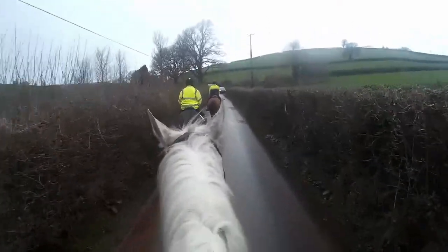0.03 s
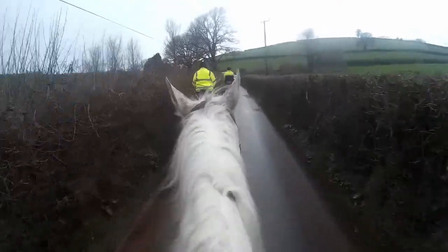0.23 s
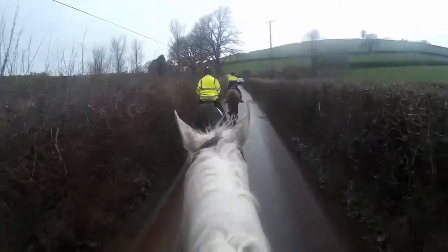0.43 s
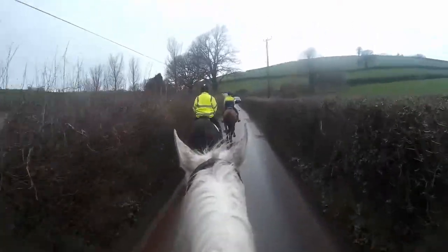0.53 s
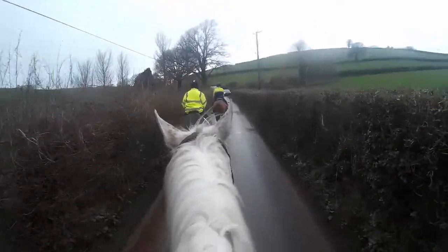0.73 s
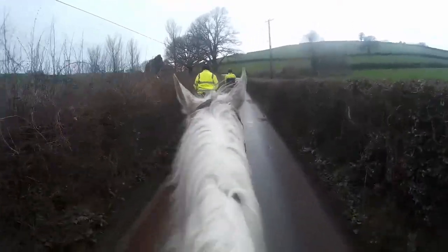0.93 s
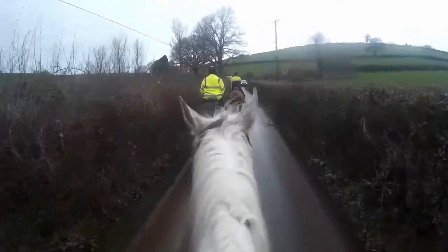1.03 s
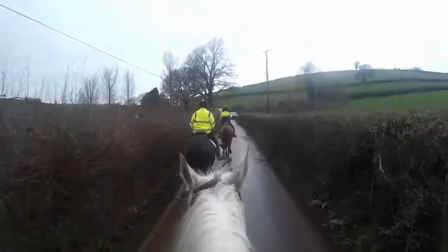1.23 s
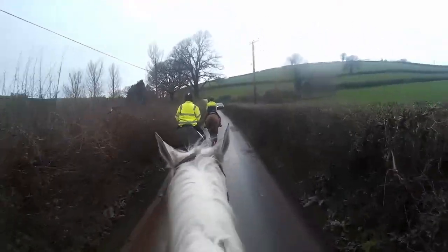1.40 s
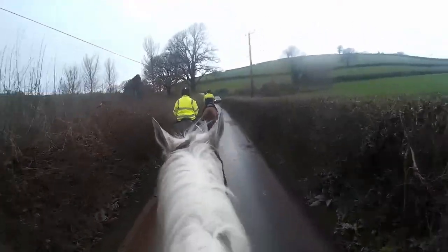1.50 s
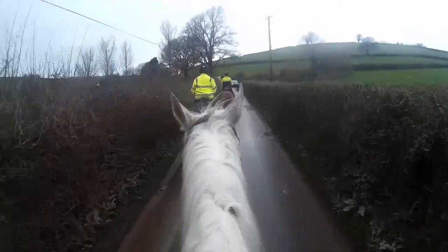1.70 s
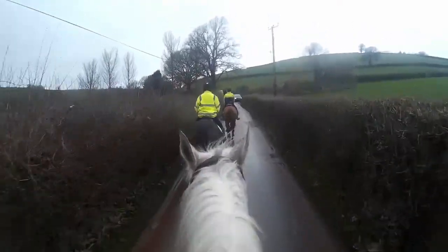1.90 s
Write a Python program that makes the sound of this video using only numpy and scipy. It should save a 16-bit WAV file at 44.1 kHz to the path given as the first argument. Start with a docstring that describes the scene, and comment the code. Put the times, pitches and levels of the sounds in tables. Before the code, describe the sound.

A walking horse's hooves clop on a paved lane, heard from the saddle, at about 0.2, 0.6, 0.9, 1.3 and 1.6 seconds, the first loudest. A shoe scrapes briefly near 0.6 and 1.3 seconds. Low microphone thumps with small tack clicks come around 0.2, 0.9 and 1.6 seconds, among soft saddle bumps. Other horses clop more quietly ahead throughout, over faint outdoor air.

```python
"""Hard, hollow hoof knocks on a wet paved lane between hedges, heard from the saddle of a walking horse.
Each impact of a shoe excites the resonances of the hoof; now and then a shoe slides in stick-slip.
Once a stride a jolt thumps the microphone and the tack clicks, and the swaying rider bumps softly.
Other horses clop a little way ahead, over faint outdoor air. Only the left channel sounds."""
import sys
import numpy as np
from scipy import signal
from scipy.fft import rfft, irfft, next_fast_len
from scipy.io import wavfile

SR = 44100
rng = np.random.default_rng(int(sys.argv[2]) if len(sys.argv) > 2 else 0)


def log_audio(samples):
    """Write samples as a 16-bit WAV file to the path given in sys.argv[1]."""
    # one column per channel
    frames = np.atleast_2d(samples).T
    # limit to full scale, then quantise
    limited = np.clip(frames, -1, 1)
    pcm = np.round(limited * 32767).astype(np.int16)
    wavfile.write(sys.argv[1], SR, pcm)


N = 85995
SIZE = 16384  # samples in one short event
T = np.arange(SIZE) / SR

# the ridden horse's shoes land, heel then toe:
# start_s, level_db, pitch_ratio, tilt_db_per_octave, sole_lift_db
HOOF_STRIKES = [(0.2016, -17.5, 1.018, 1.43, 10), (0.2087, -29.5, 1.012, -1, 26),
                (0.5615, -29, 1.05, -0.04, 7.5), (0.5750, -47, 1, -2.5, 6), (0.8962, -23, 1.026, 0.7, 8.5),
                (0.9030, -48, .985, 5.5, 26), (1.2581, -23.3, 1.0, 0, 5), (1.2752, -42.5, 1.02, 2, 10),
                (1.5890, -36.5, 1.033, 0, 9.5), (1.5986, -38, 1.0, -1, 9.5), (1.6024, -51.5, 1, -4, -7)]
# a shoe slides: start_s, length_s, level_db, swell_db
SHOE_SLIDES = [(0.063, 0.031, -52, -16), (0.577, 0.043, -39, 10.5), (0.715, 0.027, -53.5, -5),
               (1.276, 0.048, -36, -2.5), (1.323, 0.057, -48.5, -15), (1.413, 0.033, -50, 7),
               (1.467, 0.05, -47, -5)]
# jolts through the saddle: centre_s, peak_db
STRIDE_JOLTS = [(0.235, -14), (0.937, -15.5), (1.648, -19)]
# bumps of saddle and rider: centre_s, level_db, width_s
SADDLE_BUMPS = [(0.12, -42, 0.0023), (0.154, -38.5, 0.0059), (0.191, -34.5, 0.0036), (0.343, -46, 0.019),
                (0.595, -39.5, 0.025), (0.675, -48, 0.024), (1.294, -36, 0.02), (1.404, -44, 0.012),
                (1.462, -45, 0.022), (1.628, -32.5, 0.014)]
# straps and buckles click: start_s, level_db, tilt_db_per_octave
TACK_CLICKS = [(0.2274, -52, -6), (0.2318, -49, 5), (0.234, -62, 6), (0.254, -53.5, 3.5),
               (0.2557, -64, 2.5), (0.2568, -46.5, 1), (0.9264, -49.5, 2.5), (0.9298, -50, -0.5),
               (0.944, -56, -14), (0.9555, -48, -8), (1.6492, -41, 0), (1.667, -47, -1), (1.671, -47.5, -2)]
# hooves of the horses ahead: start_s, level_db, pitch_hz, tilt_db_per_octave, scuff_decay_s
FAR_STRIKES = [(0.02, -55, 1540, -9, 0.0081), (0.077, -51.5, 1070, 0, 0.004),
               (0.2941, -44.5, 1003, 2, 0.0025), (0.3031, -45.5, 1460, 4, 0.0038),
               (0.3065, -46.5, 1030, -2, 0.0061), (0.314, -52, 1900, 8, .002),
               (0.387, -59, 770, -1, 0.00073), (0.41, -57.5, 674, -1.5, 0.0055),
               (0.4251, -49, 1360, -1.5, 0.0016), (0.4301, -47, 1390, -1, 0.003),
               (0.6451, -46, 1320, -0.5, 0.0012), (0.6515, -42.5, 920, -1, 0.002),
               (0.660, -49.5, 1490, 6, 0.011), (0.68, -49, 1380, -5, 0.0029),
               (0.775, -45.5, 1380, -6.5, 0.0026), (0.790, -50, 1400, 2, 0.012),
               (0.819, -56, 1360, 6.5, 0.0041), (0.9874, -41, 1430, -2.5, 0.0045),
               (0.993, -40, 1470, 0.5, 0.0021), (1.0025, -42, 897, 3, 0.0023),
               (1.083, -53.5, 650, -2, 0.0004), (1.126, -50.5, 695, -2, 0.0019),
               (1.1315, -41.5, 1273, 4.5, 0.0018), (1.191, -59, 1500, 1, 0.0082),
               (1.341, -48.5, 1050, 3, 0.0012), (1.348, -48, 1100, 3.5, 0.006),
               (1.487, -42, 1320, 0, 0.0072), (1.495, -53, 1270, -2.5, 0.0024),
               (1.549, -53.5, 1460, 2, 0.0041), (1.68, -47, 1460, 0.5, 0.00066),
               (1.683, -39, 1476, -3, 0.0013), (1.691, -48.5, 880, 4, 0.0049),
               (1.8047, -50.5, 1490, 2, 0.0015), (1.840, -63, 1230, -6, 0.00071),
               (1.8447, -45.5, 875, -7, .0005), (1.8462, -48.5, 1310, -5, 0.00072),
               (1.921, -58.5, 790, 6.5, 0.0019)]

# resonances: pitch_hz, lift_db, t60_s
HOLLOW_MODES = [(1468, 15, .055), (1680, 5, .025), (1870, 3, .016)]  # the hollow of the hoof
LOW_BODY_MODES = [(262, 3, .04), (340, 6.5, .045), (447, 8.5, .06)]  # the body of the hoof
FAR_HOOF_MODES = [(950, 2, .025), (1400, 2, .025), (4400, 3, .04)]  # hooves ahead: two hollow rings and the iron shoe

# spectral envelope of each source: frequency_hz, gain_db
KNOCK_SPECTRUM = [(50, -14.5), (130, 0), (350, 2), (600, -2.5), (1000, -3.5), (1280, -8), (1600, -2.5),
                  (1970, -2.5), (2250, -22.5), (2580, -33), (2900, -18), (3500, -24.5), (3900, -29),
                  (4400, -38), (5500, -47), (8000, -67), (15000, -78)]
SCRAPE_SPECTRUM = [(50, -19), (130, -15), (350, 1), (600, -1.5), (950, 1), (1200, -7.5), (1600, -5),
                   (2000, -6), (2300, -24), (2600, -37), (3000, -23), (3600, -35), (4600, -42),
                   (8000, -51.5), (15000, -56.5)]
CLOTHES_SPECTRUM = [(30, 5), (70, -9.5), (150, -14), (300, -28.5), (700, -36.5), (2000, -45.5),
                    (8000, -70.5)]
BUMP_SPECTRUM = [(15, 5), (35, 7), (70, -21), (150, -14.5), (280, -16), (700, -42), (4000, -69)]
TACK_SPECTRUM = [(200, -19), (600, -10), (1050, 6), (1450, 2), (1900, 2), (2500, -15), (3500, -15),
                 (4200, -27), (6000, -33), (15000, -58)]
CLOP_SPECTRUM = [(100, -28.5), (450, -5), (700, 0), (880, 1), (1400, -0.5), (1950, -1.5), (2500, -16.5),
                 (3300, -17), (4500, -22.5), (6000, -55), (15000, -57.5)]
AIR_SPECTRUM = [(15, -4.5), (32, -2), (65, -18.5), (150, -14.5), (300, -21), (600, -26), (1000, -34),
                (1600, -32), (2000, -37.5), (2500, -40.5), (4300, -42.5), (5500, -43), (10000, -45),
                (15000, -51)]

SOLE_HZ, SOLE_T60_S = 762, 0.05
NEAR_ECHO_DB, FAR_ECHO_DB = -19.5, -7.5  # scattered sound relative to direct sound


def ridden_hooves(grit_decay_s=0.003, grit_low_hz=3900):
    """Impact excitation: a blow and a crunch of grit ring the hoof's hollow, body and sole."""
    out = np.zeros(N)
    highpass = signal.butter(2, grit_low_hz, "high", fs=SR)
    for start_s, level_db, pitch_ratio, tilt_db, sole_db in HOOF_STRIKES:
        force = (T == 0) + signal.lfilter(*highpass, noise_burst(grit_decay_s))
        knock = resonate(colour(force, KNOCK_SPECTRUM, tilt_db), HOLLOW_MODES, pitch_ratio)
        knock = resonate(knock, LOW_BODY_MODES + [(SOLE_HZ, sole_db, SOLE_T60_S)])
        knock = at_level(disperse(knock, stages=3), level_db)
        add(out, start_s, hedge_scatter(knock, NEAR_ECHO_DB))
    return out


def sliding_shoes(slips_per_s=1600, hiss_db=1, sole_db=5):
    """Stick-slip friction: a shoe catches and slips at random, driving the modes of the same hoof."""
    out = np.zeros(N)
    modes = HOLLOW_MODES + LOW_BODY_MODES + [(SOLE_HZ, sole_db, SOLE_T60_S)]
    for start_s, length_s, level_db, swell_db in SHOE_SLIDES:
        slips = unit((rng.random(SIZE) < slips_per_s / SR) * rng.standard_normal(SIZE))
        hiss = from_db(hiss_db) * unit(rng.standard_normal(SIZE))
        envelope = (T < length_s) * from_db(swell_db * np.minimum(T / length_s, 1))
        scrape = resonate(colour((slips + hiss) * envelope, SCRAPE_SPECTRUM), modes)
        add(out, start_s, hedge_scatter(at_level(scrape, level_db, length_s), NEAR_ECHO_DB))
    return out


def stride_jolts(rocking_hz=29.2, width_s=0.015, rustle_db=-13, rustle_width_s=0.043):
    """Structure-borne vibration: each stride briefly rocks the microphone as the clothes rustle."""
    out = np.zeros(N)
    clothes = steady_noise(CLOTHES_SPECTRUM)
    for centre_s, peak_db in STRIDE_JOLTS:
        t = np.arange(N) / SR - centre_s
        rocking = -np.cos(2 * np.pi * rocking_hz * t) * np.exp(-.5 * (t / width_s) ** 2)
        rustle = from_db(rustle_db) * clothes * np.exp(-np.abs(t) / rustle_width_s)
        out += from_db(peak_db) * (rocking + rustle)
    return out


def saddle_bumps():
    """Soft contact carries little treble: the rider's sway gives smooth swells of low noise."""
    t = np.arange(N) / SR
    envelope = sum(from_db(level_db) * np.exp(-.5 * ((t - centre_s) / width_s) ** 2)
                   for centre_s, level_db, width_s in SADDLE_BUMPS)
    return envelope * steady_noise(BUMP_SPECTRUM)


def tack(rattle_decay_s=0.002):
    """Damped transients: a strap or buckle clicks, then settles in a brief rattle."""
    out = np.zeros(N)
    for start_s, level_db, tilt_db in TACK_CLICKS:
        force = (T == 0) + noise_burst(rattle_decay_s)
        add(out, start_s, at_level(colour(force, TACK_SPECTRUM, tilt_db), level_db))
    return out


def horses_ahead(knock_cutoff_hz=2410, lift_db=12, ring_cycles=19, scuff_db=-7, scuff_rise_s=0.0026):
    """Distance raises the share of scattered sound around each rounded knock and scuff of grit."""
    out = np.zeros(N)
    knock = unit(signal.lfilter(*signal.butter(2, knock_cutoff_hz, fs=SR), 1. * (T == 0)))
    for start_s, level_db, pitch_hz, tilt_db, decay_s in FAR_STRIKES:
        scuff = noise_burst(decay_s, attack=np.minimum(T / scuff_rise_s, 1))
        scuff_gain = from_db(scuff_db) * np.sqrt(decay_s / 0.0001)  # scuff_db at 0.1 ms; longer is stronger
        modes = [(pitch_hz, lift_db, ring_cycles / pitch_hz)] + FAR_HOOF_MODES
        clop = resonate(colour(knock + scuff_gain * scuff, CLOP_SPECTRUM, tilt_db), modes)
        clop = at_level(disperse(clop, stages=2), level_db)
        add(out, start_s, hedge_scatter(clop, FAR_ECHO_DB))
    return out


def hedge_scatter(x, echo_db, t60_s=0.13, rise_s=0.0024):
    """Diffuse reflection: the lane and its hedges add a short tail to the direct sound."""
    response = noise_burst(t60_s / np.log(1000), attack=np.minimum(T / rise_s, 1))
    return x + from_db(echo_db) * signal.fftconvolve(x, response)[:SIZE]


def outdoor_air(level_db=-55.5):
    """Stationary ambient noise: a faint rumble under an even hiss."""
    return from_db(level_db) * steady_noise(AIR_SPECTRUM)


def resonate(x, modes, pitch_ratio=1):
    """Resonance: each damped mode lifts a narrow band and lets it ring on."""
    for pitch_hz, lift_db, t60_s in modes:
        radius = np.exp(-np.log(1000) / (t60_s * SR))
        band = signal.lfilter([1, 0, -1], pole_pair(pitch_hz * pitch_ratio, radius), x + 1e-18)
        x = x + (from_db(lift_db) - 1) * (1 - radius ** 2) / 2 * band
    return x


def disperse(x, stages, centre_hz=1100, width_hz=710):
    """Dispersion: each all-pass stage delays the middle frequencies by about a millisecond."""
    poles = pole_pair(centre_hz, np.exp(-np.pi * width_hz / SR))
    for _ in range(stages):
        x = signal.lfilter(poles[::-1], poles, x)
    return x


def pole_pair(pitch_hz, radius):
    """Feedback coefficients of a damped harmonic oscillator."""
    return np.array([1, -2 * radius * np.cos(2 * np.pi * pitch_hz / SR), radius ** 2])


def colour(x, spectrum, tilt_db=0):
    """Minimum-phase filtering: impose a spectral envelope, tilted by tilt_db per octave."""
    size = 2 * next_fast_len(len(x))
    octave = np.log2(np.maximum(np.fft.rfftfreq(size, 1 / SR), 10))
    frequency_hz, gain_db = np.transpose(spectrum)
    curve_db = np.interp(octave, np.log2(frequency_hz), gain_db) + tilt_db * octave
    cepstrum = irfft(np.log(from_db(curve_db)))
    cepstrum[1:size // 2] *= 2  # folding onto positive time makes the filter causal
    cepstrum[size // 2 + 1:] = 0
    return irfft(rfft(x, size) * np.exp(rfft(cepstrum)))[:len(x)]


def noise_burst(decay_s, attack=1):
    """Exponentially decaying noise with the energy of a unit impulse."""
    return unit(rng.standard_normal(SIZE) * np.exp(-T / decay_s) * attack)


def steady_noise(spectrum):
    """Spectrally shaped noise of rms 1, as long as the scene."""
    return unit(colour(rng.standard_normal(N), spectrum), N / SR)


def unit(x, seconds=1 / SR):
    """Normalise to the energy of a sound of rms 1 that lasts this long."""
    return x * np.sqrt(seconds * SR / (np.sum(x ** 2) + 1e-20))


def at_level(x, level_db, seconds=0.01):
    """Set the equivalent level: the sound's energy averaged over this duration."""
    return from_db(level_db) * unit(x, seconds)


def from_db(db):
    """Amplitude ratio of a level in decibels."""
    return 10 ** (np.asarray(db) / 20)


def add(out, start_s, x):
    """Superpose a sound at its start time."""
    start = int(start_s * SR)
    out[start:start + len(x)] += x[:N - start]


def scene():
    """Superposition: all sources sum in the left channel; the right is silent."""
    hooves = ridden_hooves() + sliding_shoes() + horses_ahead()
    riding = tack() + stride_jolts() + saddle_bumps()
    return np.array([hooves + riding + outdoor_air(), np.zeros(N)])


def record(dry):
    """Band limiting: a steep low-pass removes the treble above 15.3 kHz."""
    return signal.sosfilt(signal.ellip(10, .1, 80, 15300, fs=SR, output="sos"), dry)


dry = scene()
out = record(dry)
log_audio(out)
```